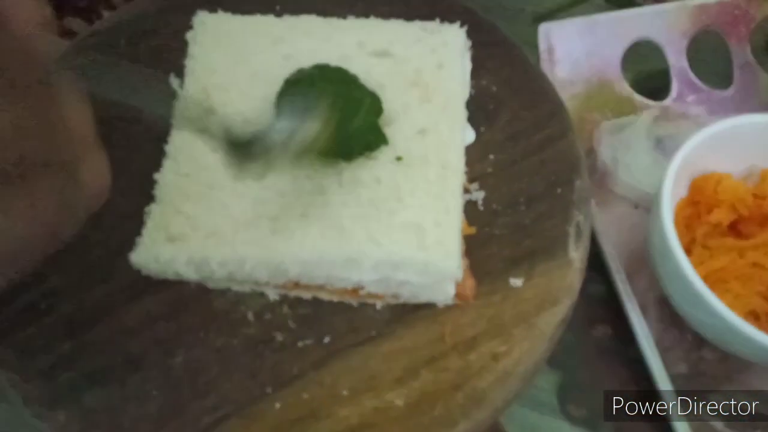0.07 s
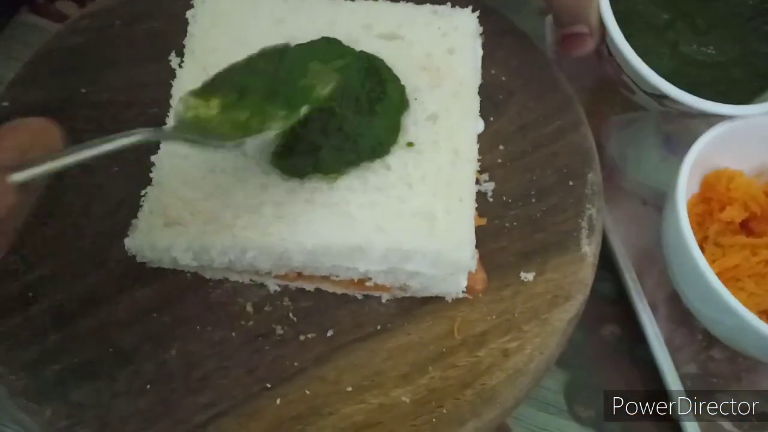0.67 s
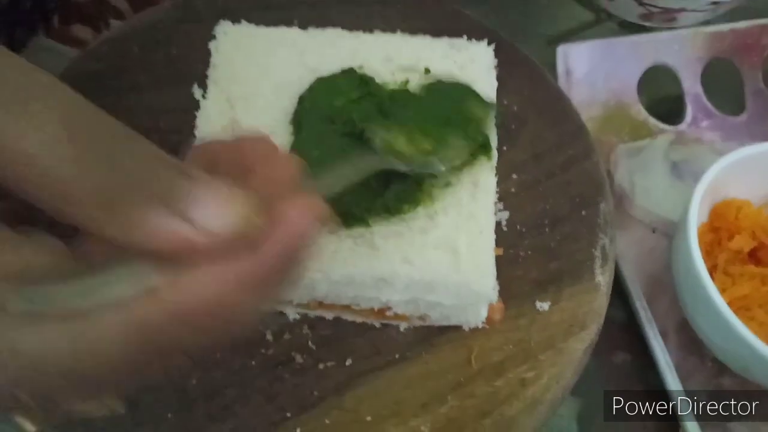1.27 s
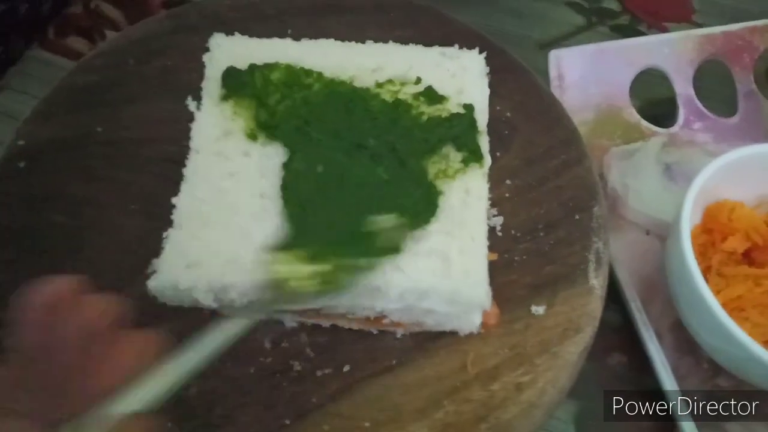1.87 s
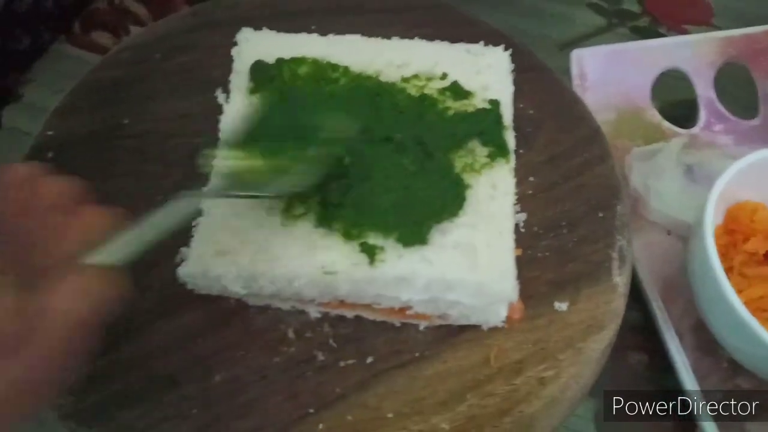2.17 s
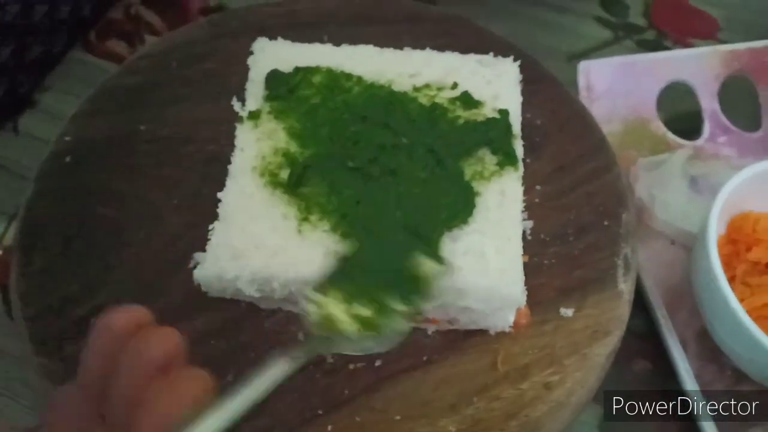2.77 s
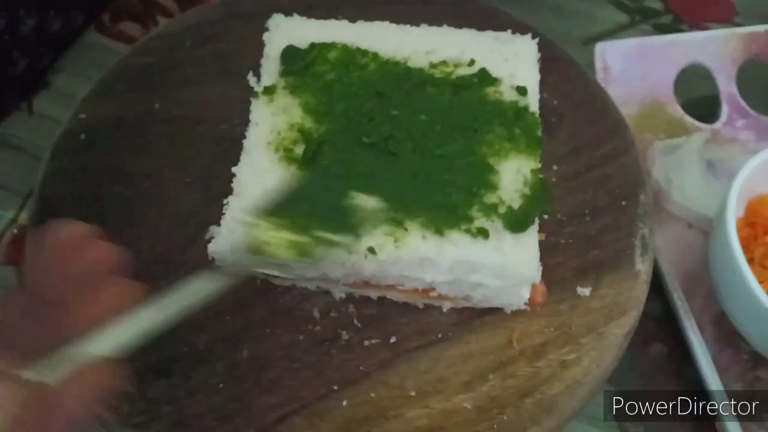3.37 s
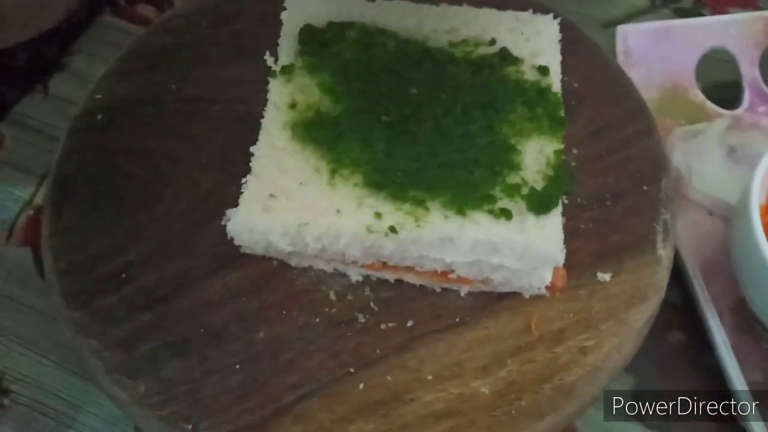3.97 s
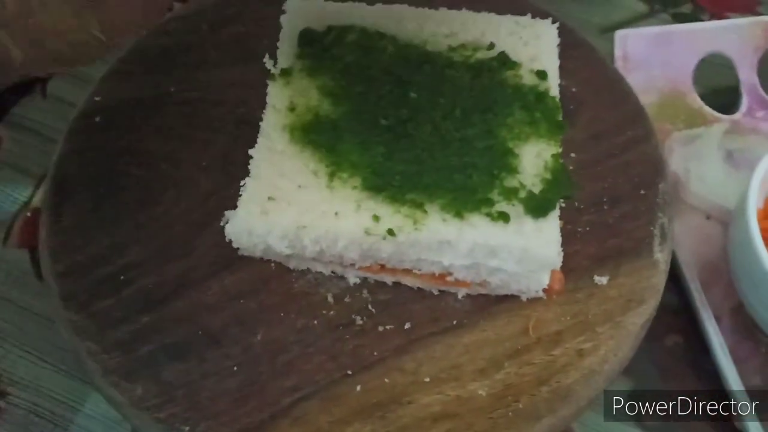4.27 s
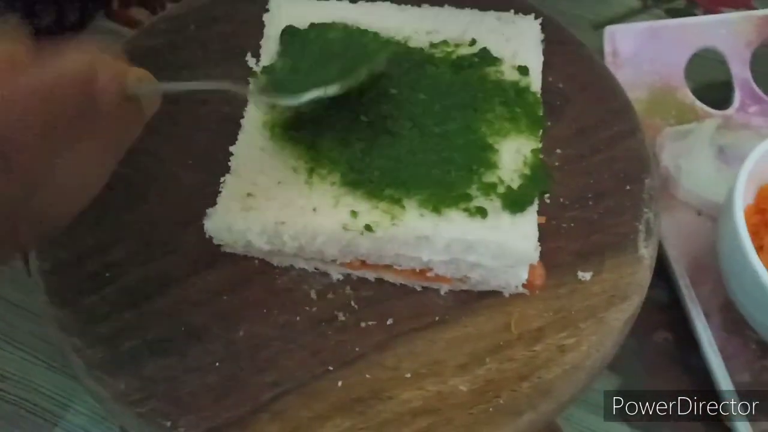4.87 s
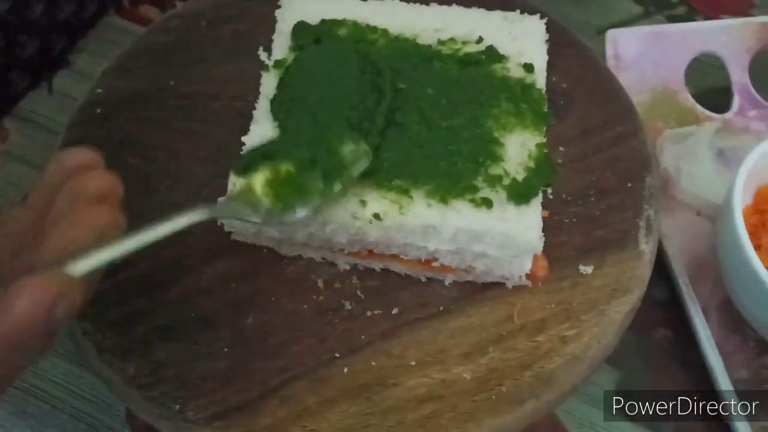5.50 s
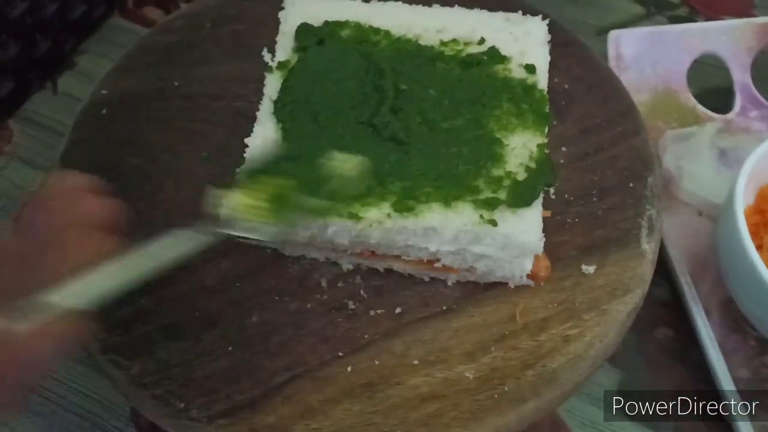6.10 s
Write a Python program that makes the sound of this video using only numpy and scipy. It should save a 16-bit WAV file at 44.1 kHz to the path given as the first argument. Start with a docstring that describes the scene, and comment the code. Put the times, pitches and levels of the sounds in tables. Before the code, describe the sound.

A steel spoon spreads paste over bread on a wooden board, making soft, low thuds in short, uneven runs. Near the start a bowl is set down with a quick clack, followed by a light steel clink. Past the middle, the spoon taps the bowl a few times with faint wet crackles, then the spreading resumes. The thuds sound close, over a steady dull kitchen hiss and a low fan hum.

```python
"""A steel spoon spreads chutney over bread on a wooden board, in a kitchen full of steady hiss.
The spoon sticks and slips, thudding softly through the board, and tiny bubbles crackle in the paste.
The chutney bowl is set down with a clack, steel clinks, and the spoon taps the bowl as it scoops.
The spoon squeaks once as it is drawn away. A fan hums throughout."""
import sys
import numpy as np
from scipy import signal
from scipy.fft import rfft, irfft
from scipy.io import wavfile

SR = 44100
rng = np.random.default_rng(int(sys.argv[2]) if len(sys.argv) > 2 else 0)


def output_pcm(signal):
    """Save a mono or channel-first signal as 16-bit PCM at the path in sys.argv[1].

    Samples are clipped to [-1, 1] before scaling.
    """
    pcm = np.clip(np.atleast_2d(signal).T, -1, 1) * 32767
    wavfile.write(sys.argv[1], SR, np.round(pcm).astype(np.int16))


N = 275216
TIME = np.arange(N) / SR
FREQS = np.fft.rfftfreq(N, 1 / SR)
RING = np.arange(SR // 3) / SR  # seconds since a hit

# Table levels are relative. A t60 is the time a sound takes to fade by 60 dB.
# tone colour of the dull hiss: f/Hz, level/dB
HISS_COLOUR = [(15, -55), (25, -80), (64, -12.5), (91, -12), (124, -4), (204, -5), (236, -5), (373, -5.5),
               (450, -5.5), (654, -11), (1150, -10.5), (1380, -12), (2530, -13), (2990, -16.5),
               (3600, -44.5), (4680, -105), (7920, -120)]
# humps in the faint high hiss: f/Hz, width/Hz, level/dB
HIGH_HISS_HUMPS = [(4075, 304, -2.5), (4970, 430, -6.5), (6176, 420, 2), (6900, 470, -0.5),
                   (8270, 330, -12.5), (9190, 310, -11.5), (11400, 380, -15.5), (13650, 550, -13),
                   (14800, 800, -24)]
# narrow bands that drone in the hiss: f/Hz, width/Hz, level/dB
DRONE_BANDS = [(121, 45, -66.5), (432, 48, -51), (1135, 57, -48.5)]
# wet smears of paste: middle t/s, length/s, level/dB
SMEARS = [(0.037, 0.22, -64.5), (3.86, .09, -61.5), (4.27, .06, -62), (4.395, .09, -62), (4.92, .18, -69),
          (6.04, .07, -69)]
# tone colour of the crackling paste: f/Hz, level/dB
PASTE_COLOUR = [(3000, -22), (4500, -9), (6700, 9), (7800, -7), (9600, -2), (10700, -12), (14000, -11),
                (15500, -15)]
# strokes of the spoon on the bread: start t/s, length/s, force/dB
STROKES = [(0.131, 0.39, -40), (0.702, 0.069, -35), (1.885, 0.063, -20), (2.026, 0.085, -29.5),
           (2.166, 0.021, -30), (2.216, .005, -29), (2.45, 0.13, -39), (3.412, 0.044, -33.5),
           (3.563, 0.038, -36.5), (3.7, 0.13, -42), (5.159, 0.053, -32.5), (5.264, 0.013, -28.5),
           (5.318, 0.075, -27), (5.464, 0.05, -29.5)]
# clacks of the rocking bowl: t/s, level/dB, scratch against the tone/dB
CLACKS = [(.5013, -17, -3), (.5106, -21, 3), (.5136, -15, -2), (.5205, -24, 14.5)]
# ringing tones of the bowl on its tray: f/Hz, level/dB, t60/s
BOWL_TONES = [(94.5, -9.5, 0.1), (266, -10, 0.056), (380, -9, 0.095), (502, -0.5, 0.12), (673, -5, 0.059),
              (830, -10.5, 0.058), (995, -8.5, 0.056), (1330, 0, 0.017), (1670, 0, 0.032), (1987, 0, 0.039)]
# tone colour of a hard hit: f/Hz, level/dB
HIT_COLOUR = [(100, 2), (500, -2), (2700, -0.5), (3200, -7), (3650, -32), (4150, -17), (5400, -22),
              (6800, -12), (9400, -25), (10500, -34), (12000, -27), (14000, -26), (15500, -35)]
# clinks on the bowl's rim and on the spoon: t/s, level/dB, scratch against the tone/dB
RIM_CLINKS = [(.5038, -58, -8), (0.5157, -18.5, 5.5)]
SPOON_CLINKS = [(.6866, -29.5, 15)]
# ringing tones of the steel rim and spoon: f/Hz, level/dB, t60/s
RIM_TONES = [(2620, -16, 0.045), (4530, -16, 0.043), (7960, -6, 0.056), (8000, -21, 0.17),
             (11800, -18, 0.042), (14120, -21, .03)]
SPOON_TONES = [(2146, 5, 0.083), (5000, -13.5, .06), (8600, -16, .055), (13170, -37, .09)]
# taps of the spoon in the bowl: t/s, level/dB, f/Hz, scratch against the tone/dB
TAPS = [(.689, -22.5, 1070, -9), (4.2423, -19.5, 2480, 9.5), (4.243, -21, 892, 8), (4.3018, -23, 1290, -2),
        (4.3639, -14, 1170, -5.5), (4.403, -29, 1220, -14)]


def amp(db):
    """Turns decibels into a gain to multiply by."""
    return 10 ** (np.asarray(db) / 20)


def unit(x):
    """Scales a sound to an average strength (rms) of 1."""
    return x / np.sqrt(np.mean(x ** 2) + 1e-20)


def gains(colour):
    """Turns a tone colour table into a gain for every frequency."""
    hz, db = np.transpose(colour)
    return amp(np.interp(np.log(FREQS + 1), np.log(hz + 1), db))


def filtered(x, gain):
    """Turns each frequency of a sound up or down by its gain."""
    return irfft(rfft(x) * gain, N)


def noise(gain):
    """Noise of strength 1 with the given tone colour."""
    return unit(filtered(rng.standard_normal(N), gain))


def hump(hz, width_hz):
    """Gains that favour the frequencies near one pitch."""
    return 1 / (1 + ((FREQS - hz) / width_hz) ** 2 * 2)


def swell(middle_s, length_s):
    """A level that rises and falls smoothly."""
    return np.exp(-(2 * (TIME - middle_s) / length_s) ** 2)


def add(mix, start_s, sound):
    """Mixes a sound in at the given time."""
    part = mix[max(round(start_s * SR), 0):][:len(sound)]
    part += sound[:len(part)]


def hiss(dull_db=-32.5, high_db=-61.5, floor_db=-23, waver_db=0.77):
    """A dull hiss and a faint high one waver slightly together, over a steady drone."""
    waver = amp(waver_db * noise(FREQS < 12))
    hump_power = sum((amp(db) * hump(hz, width)) ** 2 for hz, width, db in HIGH_HISS_HUMPS)
    dull = amp(dull_db) * noise(gains(HISS_COLOUR))
    high = amp(high_db) * noise(np.sqrt(hump_power + amp(floor_db) ** 2))
    drone = sum(amp(db) * noise(hump(hz, width)) for hz, width, db in DRONE_BANDS)
    return (dull + high) * waver + drone


def fan(hz=124.2, db=-45):
    """A fan hums on one low, slightly unsteady note."""
    wobble = noise(FREQS < 5)
    return amp(db) * unit(np.sin(2 * np.pi * hz * TIME + wobble))


def paste_crackle(pops_per_s=1500):
    """Tiny bubbles burst in the paste while the spoon slides through it."""
    pops = rng.standard_normal(N) * (rng.random(N) < pops_per_s / SR)
    level = sum(amp(db) * swell(s, length) for s, length, db in SMEARS)
    return level * unit(filtered(pops, gains(PASTE_COLOUR)))


def pressure(start_s, length_s, attack_s=0.0046, release_s=0.022):
    """In one stroke the spoon bites quickly into the bread, holds, then lets go."""
    bite = np.clip((TIME - start_s) / attack_s + 1, 0, 1)
    let_go = np.exp(-np.maximum(TIME - start_s - length_s, 0) / release_s)
    return bite * let_go


def slips(start_s, length_s, force_db, gap_s=0.028, thud_db=-21, thud_hz=126, db_per_octave=12.5):
    """The spoon slips unevenly through one stroke. Gives a row for each thud: t/s, level/dB, f/Hz."""
    gap_chance, level_chance, pitch_chance = rng.uniform(-1, 1, (16, 3)).T * np.sqrt(3)
    gaps = gap_s * np.exp(0.186 * gap_chance)
    delays = np.cumsum(gaps) - gaps
    harder_db = force_db + 28.5  # force above that of a middling stroke
    db = thud_db + 1.34 * harder_db - 1.6 * level_chance  # light strokes glide, hard ones grip
    # Bread pressed harder is stiffer, so it thuds higher.
    hz = thud_hz * 2 ** (harder_db / db_per_octave + 0.22 * pitch_chance)
    hz[0] = 108  # the first thud is deep: the bread is not yet packed down
    return np.column_stack([start_s + delays, db, hz])[delays < length_s]


def spreading(rise_s=0.0027, low_cut_hz=55, rest_db=-42.5, rumble_db=-0.5):
    """The spoon sticks and slips in soft bread: the board gives a low rumble and cushioned thuds."""
    board_colour = hump(hz=125, width_hz=150) * FREQS ** 2 / (FREQS ** 2 + low_cut_hz ** 2)
    force = sum(amp(db) * pressure(start, length) for start, length, db in STROKES)
    # Faint handling rumble goes on between strokes.
    out = (amp(rest_db) + amp(rumble_db) * force) * noise(board_colour)
    thud_shape = RING / rise_s * np.exp(1 - RING / rise_s)
    for stroke in STROKES:
        for s, db, hz in slips(*stroke):
            add(out, s, amp(db) * thud_shape * np.sin(2 * np.pi * hz * RING))
    return out


def fading_tone(hz, t60):
    """One tone of a struck object, dying away."""
    return amp(-60 * RING / t60) * np.sin(2 * np.pi * hz * RING)


def scratch(t60=0.019):
    """A short burst of grit where two hard surfaces meet."""
    return rng.standard_normal(len(RING)) * amp(-60 * RING / t60)


def bowl_clacks():
    """The full bowl rocks as it is set down; the paste inside soon stops its ringing."""
    out = np.zeros(N)
    # Every second tone starts by swinging the other way.
    ring = sum((-1) ** k * amp(db) * fading_tone(hz, t60) for k, (hz, db, t60) in enumerate(BOWL_TONES))
    for s, db, scratch_db in CLACKS:
        add(out, s, amp(db) * (ring + amp(scratch_db) * scratch()))
    return filtered(out, gains(HIT_COLOUR))


def steel_clinks(hits, tones, scratch_t60):
    """Each hit ticks and sets the steel ringing."""
    ring = sum(amp(db) * fading_tone(hz, t60) for hz, db, t60 in tones)
    rings, ticks = np.zeros((2, N))
    for s, db, scratch_db in hits:
        add(rings, s, amp(db) * ring)
        add(ticks, s, amp(db + scratch_db) * scratch(scratch_t60))
    return rings + filtered(ticks, gains(HIT_COLOUR))


def kitchen_echo(x, t60=0.51, echo_db=-15, absorb_hz=2800, echoes_per_s=3000):
    """Adds a short, faint tail of echoes from the walls, which soak up the high notes."""
    echoes = rng.standard_normal(len(RING)) * (rng.random(len(RING)) < echoes_per_s / SR)
    tail = echoes * (RING > 0.005) * amp(-60 * RING / t60)
    room = signal.fftconvolve(x, tail / np.linalg.norm(tail))[:N]
    return x + amp(echo_db) * filtered(room, 1 / np.hypot(1, FREQS / absorb_hz))


def spoon_taps(tone_cycles=47, overtone_cycles=30, overtone_ratio=1.296, overtone_db=-1.0):
    """The scooping spoon taps the bowl: a scratch and two tones, cut short by the paste."""
    out = np.zeros(N)
    for s, db, hz, scratch_db in TAPS:
        tone = fading_tone(hz, t60=tone_cycles / hz)
        overtone_hz = overtone_ratio * hz
        overtone = amp(overtone_db) * fading_tone(overtone_hz, t60=overtone_cycles / overtone_hz)
        add(out, s, amp(db) * (tone + overtone + amp(scratch_db) * scratch()))
    return filtered(out, gains(HIT_COLOUR))


def spoon_squeak(db=-61):
    """The steel rubs thinly as the spoon is drawn away."""
    return amp(db) * swell(middle_s=3.67, length_s=0.1) * noise(hump(hz=6830, width_hz=240))


def scene():
    """Hard hits echo in the room, while the soft spreading stays close, over hiss and hum."""
    rim = steel_clinks(RIM_CLINKS, RIM_TONES, scratch_t60=0.069)
    spoon = steel_clinks(SPOON_CLINKS, SPOON_TONES, scratch_t60=0.02)
    hits = kitchen_echo(bowl_clacks() + rim + spoon + spoon_taps())
    close = spreading() + paste_crackle() + spoon_squeak()
    return (hits + close + hiss() + fan())[None]


def record(dry, low_cut_hz=50, high_cut_hz=15550):
    """Takes away the deepest rumble and the very highest hiss."""
    low_cut = signal.butter(4, low_cut_hz, "high", fs=SR, output="sos")
    high_cut = signal.firwin(601, high_cut_hz, window=("kaiser", 9), fs=SR)
    return signal.oaconvolve(signal.sosfilt(low_cut, dry), high_cut[None], "same")


dry = scene()
out = record(dry)
output_pcm(out)
```